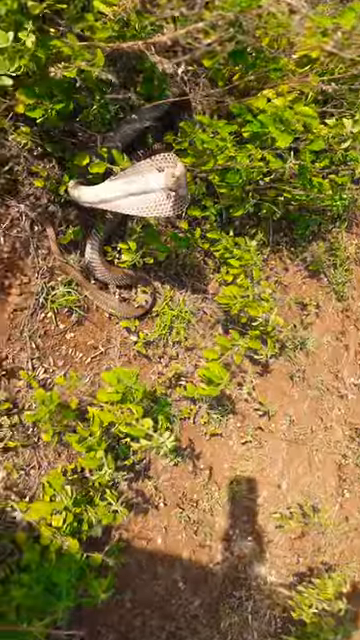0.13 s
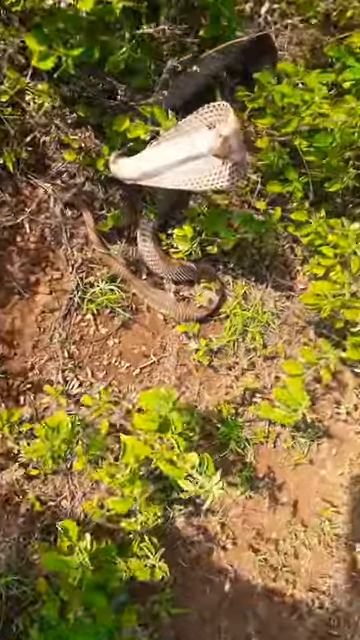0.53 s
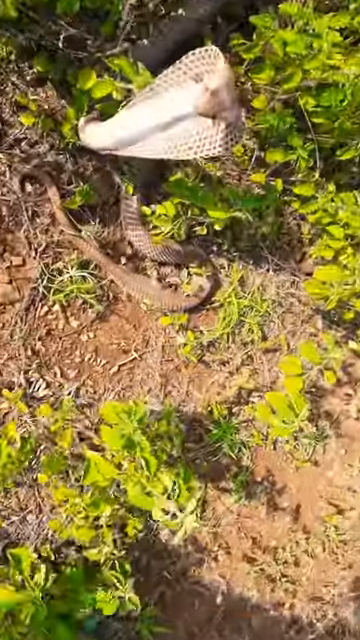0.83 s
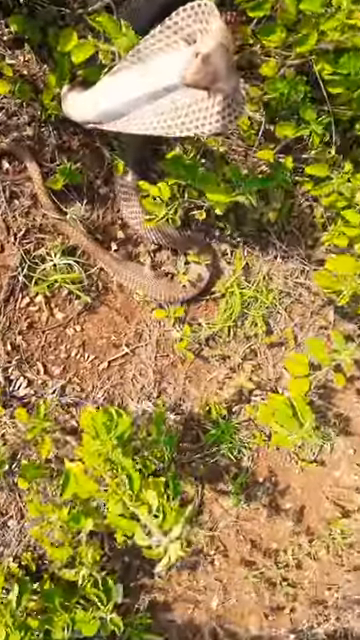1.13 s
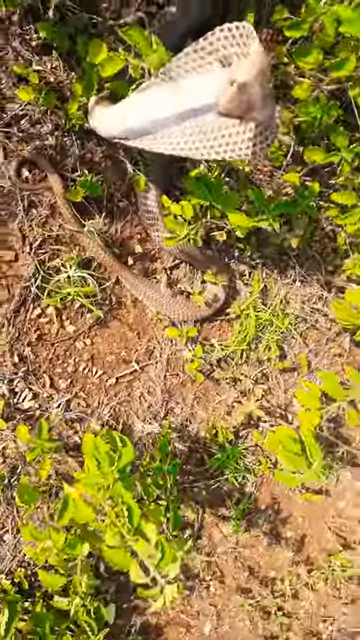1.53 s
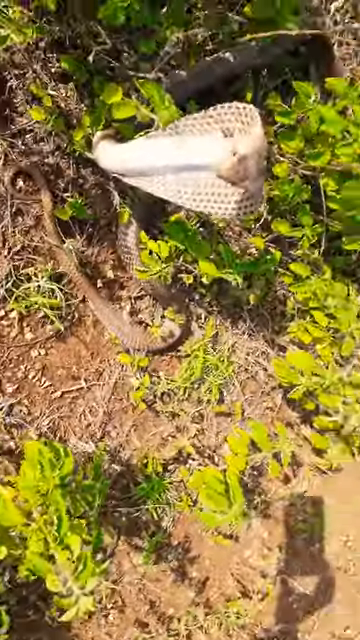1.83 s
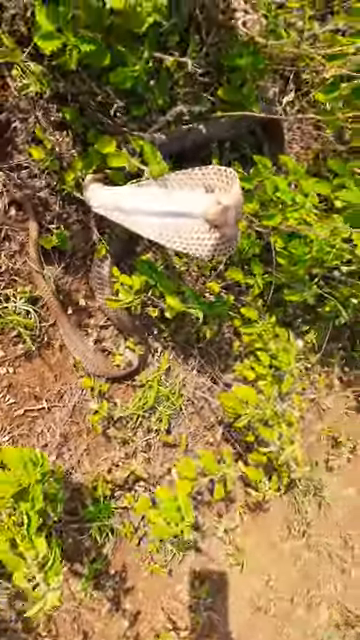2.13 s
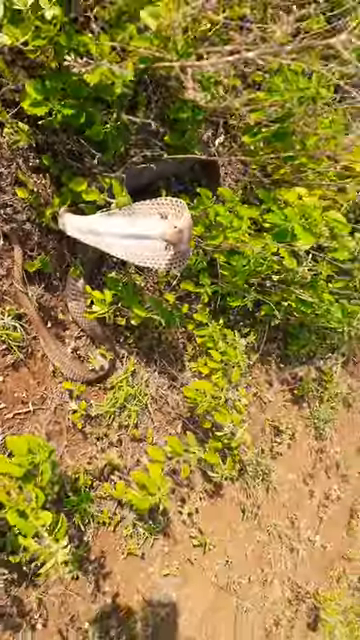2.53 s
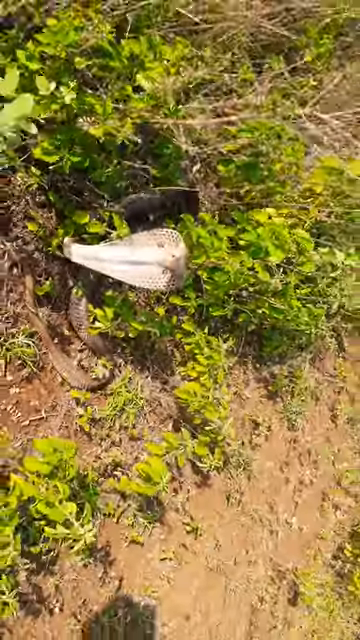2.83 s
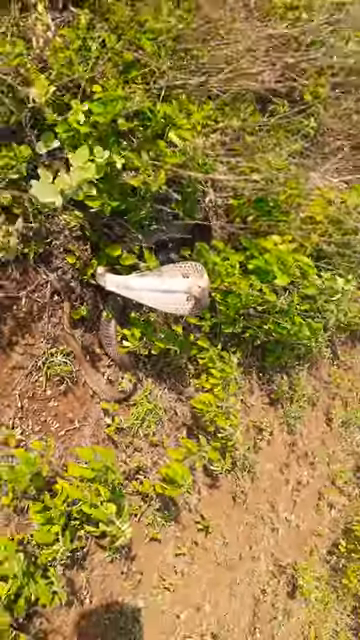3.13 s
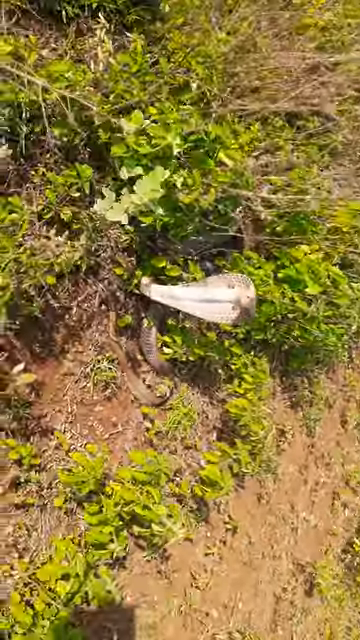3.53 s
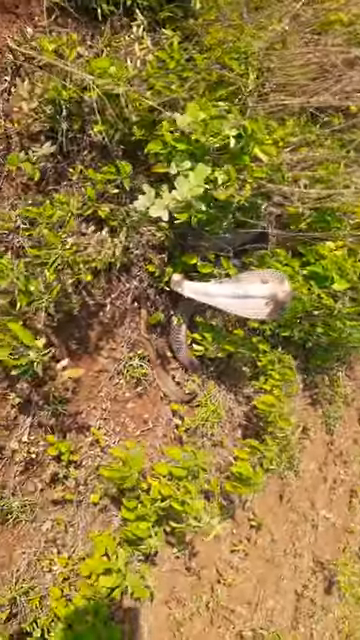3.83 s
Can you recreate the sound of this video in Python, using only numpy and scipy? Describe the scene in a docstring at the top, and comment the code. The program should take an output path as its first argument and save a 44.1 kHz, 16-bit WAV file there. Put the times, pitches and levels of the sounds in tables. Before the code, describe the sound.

A cobra blows a long, breathy hiss, pauses briefly, draws a softer, thinner hiss, then blows weakly. Uneven wind rumbles on a close stereo microphone in open dry scrub, with twig snaps and late handling thumps.

```python
"""Wind rumbles and thumps unevenly on two microphone ports while a cobra in dry scrub blows long and hard.
A softer indrawn hiss follows, then a weak blow; dry twigs and leaves tick, snap and scrape around it.
Near the end something covers and rubs the right port, and a foot scuffs the dry ground.
The hiss is noise shaped by drifting airway resonances; wind, friction and ticks are coloured noise,
thumps are short pressure swings, snaps are single pulses and the thin whistles are wavering sines."""
import sys
import numpy as np
from scipy import signal
from scipy.fft import rfft, irfft, next_fast_len
from scipy.io import wavfile
from scipy.ndimage import uniform_filter1d, map_coordinates

SR = 44100
rng = np.random.default_rng(int(sys.argv[2]) if len(sys.argv) > 2 else 0)


def wav_out(sig):
    """Save sig, one row per channel (or a flat mono array), as 16-bit PCM at SR to the path in sys.argv[1]."""
    wavfile.write(sys.argv[1], SR, np.round(np.clip(np.atleast_2d(sig).T, -1, 1) * 32767).astype(np.int16))


N = 176400

START_S, TOP_HZ = .036, 15780  # silence before this time; upper band limit

# Colour tables give relative level per Hz: the noise is scaled to rms 1 afterwards.
# distant outdoors: freq_hz, density_db
FLOOR_COLOUR = [(40, 7), (200, -10), (650, -16), (2000, -7), (3300, -21), (15000, -26)]
FLOOR_DB = -75.5

# faint rising whistles: start_s, level_db
WHISTLES = [(2.335, -67.5), (2.781, -75)]
WHISTLE_S, WHISTLE_HZ, WHISTLE_RISE_HZ_PER_S = 0.09, 4750, 8000
# the airway sings thinly: start_s, length_s, pitch_hz, level_db
AIRWAY_NOTES = [(3.484, 0.24, 2570, -75)]

# wind strength at each port: time_s, left_db, right_db
WIND_STRENGTH = [(.04, -39.5, -40), (.18, -37.5, -36), (.27, -41.5, -47), (.45, -46.5, -81),
                 (.53, -33.5, -34), (.61, -53.5, -42.5), (.68, -34.5, -32), (.83, -41, -36.5),
                 (1.03, -73, -49), (1.2, -37.5, -39.5), (1.44, -54, -40.5), (1.54, -48.5, -50),
                 (1.96, -59.5, -46), (2.2, -66.5, -56), (2.38, -53, -44), (2.6, -56.5, -77),
                 (2.71, -47.5, -46), (2.8, -53, -71), (3.02, -54, -86), (3.17, -50.5, -42),
                 (3.355, -81, -49), (3.385, -42, -35), (3.49, -49.5, -49.5), (3.65, -39, -36.5),
                 (3.72, -40, -36), (3.8, -96, -38), (4, -59, -47)]
# slow eddies: freq_hz, density_db
RUMBLE_COLOUR = [(20, -12), (35, -6.5), (60, 1.5), (110, 4), (200, -16.5), (400, -25.5), (1000, -87)]
# fast eddies: freq_hz, density_db
BUFFET_COLOUR = [(50, -17.5), (130, 1.5), (230, 0.5), (390, -4), (520, -13), (800, -27.5), (1600, -31.5),
                 (4000, -56.5)]
LUMP_DB, LUMPS_PER_S = 4, 36
# each level is relative to the reference gust; growth is dB gained per dB of wind
GUST_REF_DB = -38.5
RUMBLE_DB, RUMBLE_GROWTH = -1.5, 0.84
BUFFET_DB, BUFFET_GROWTH = -5.5, 1.52
# share of a slow eddy that pulls at the other port; left minus right
RUMBLE_OPPOSED, RUMBLE_SIDE_DB = 0.09, -1.5

# low thumps on the microphone: time_s, peak_db, pitch_hz, left_minus_right_db
THUMPS = [(0.09, -27, 189, -24), (0.159, -37.5, 103, 10), (0.494, -24, 151, 7), (0.754, -38, 283, -9),
          (0.954, -33, 148, -12), (1.194, -32, 154, 2), (1.977, -44, 204, 1), (2.147, -48, 400, 8),
          (2.303, -27, 236, 4), (2.349, -32.5, 100, -3), (2.70, -40.5, 125, -4), (3.083, -41.5, 147, 9),
          (3.419, -35.5, 150, -12), (3.673, -33.5, 533, -2), (3.684, -22, 266, -9),
          (3.7074, -16.5, 336, 0.5), (3.715, -27.5, 364, -8), (3.726, -20.5, 252, -4.5),
          (3.755, -23.5, 345, -2), (3.936, -23, 380, 4.5), (3.961, -25.5, 223, -4)]
THUMP_CYCLES, THUMP_SKEW = 0.37, 0.21  # length; spread of phase between ports (cycles)
SHUDDER_DB, SHUDDER_S = -11.5, 0.011  # relative level and decay

# dry leaves scraping: time_s, level_db, swell_and_fade_s, centre_hz, width_octaves
RUSTLES = [(.229, -54, .007, 3360, 2.4), (0.271, -44.5, 0.0092, 2220, 1.9),
           (.586, -50.5, .005, 13300, 0.23), (.69, -52.5, 0.0051, 1710, 1.4),
           (0.752, -51.5, 0.0093, 1590, 1.1)]

# dry ticks and crackles: start_s, level_db, decay_s, tilt_db_per_octave, left_minus_right_db
TICKS = [(.157, -50, 0.01, 5, 2), (2.647, -55.5, 0.0033, -1, 0), (3.078, -47, 0.0022, 5, -14),
         (3.129, -47, 0.0073, 7.5, 0), (3.478, -58, 0.0059, 2.5, -24), (3.705, -55.5, 0.0057, 2, -9),
         (3.845, -53, 0.0022, 2, 5)]
# tick colour before tilt: freq_hz, density_db
TICK_COLOUR = [(200, -14), (1300, -1), (2500, 1), (5000, -7), (7500, -4.5), (9500, -16.5), (13000, -6.5),
               (16000, -15.5)]
TICK_PIVOT_HZ, TICK_RISE = 3000, 0.55  # tilt pivot; rise time as a share of decay

# twigs snapping: start_s, peak_db, left_minus_right_db
SNAPS = [(.271, -31, 4), (.3185, -36, 4), (1.657, -22.5, 14)]
# snap spectrum: freq_hz, density_db
SNAP_COLOUR = [(300, -9), (1400, 5.5), (3000, -1), (6500, -4.5), (9500, -11), (13000, -14)]

# rubbing over the right port: time_s, level_db
RUB_LEVEL = [(3.07, -115), (3.16, -56), (3.27, -59), (3.33, -70), (3.42, -60), (3.52, -70), (3.68, -60),
             (3.76, -51.5), (3.83, -54.5), (3.9, -52), (4, -50)]
# rubbing friction: freq_hz, density_db
RUB_COLOUR = [(200, 10), (800, -4.5), (1400, -5.5), (2400, -6), (4500, -10.5), (6500, -24), (9500, -41),
              (13000, -27)]
RUB_LEFT_DB = -3  # left port relative to right

# foot on dry soil: freq_hz, density_db
SCUFF_COLOUR = [(300, 15), (1000, 3.5), (1700, -6), (2150, 3.5), (2800, -17), (4200, -6), (8000, -33),
                (12500, -12), (16000, -29)]
SCUFF_START_S, SCUFF_RELEASE_S, SCUFF_FALL_S, SCUFF_DB = 3.704, 3.782, 0.015, -46

# outward hiss by effort: time_s, level_db
BLOW_LEVEL = [(0, -57), (.25, -51), (.38, -53), (.78, -48.5), (1.3, -49), (1.5, -48.5), (1.75, -51),
              (1.93, -51.5), (2.03, -57.5), (2.12, -76.5), (2.22, -83), (3.25, -79), (3.4, -64),
              (3.6, -62.5), (3.8, -55.5), (4, -60)]
# inward hiss by effort: time_s, level_db
DRAW_LEVEL = [(2.13, -90), (2.24, -71.5), (2.36, -62.5), (2.45, -63.5), (3.12, -62), (3.36, -65.5),
              (3.45, -100)]
# outward turbulence in the airway: freq_hz, density_db
BLOW_AIR = [(100, -64), (250, -4.5), (400, -6), (550, -10.5), (1200, -16.5), (1750, -16), (2900, -20),
            (4400, -19), (6000, -16.5), (8200, -21), (9700, -23), (12000, -21), (15500, -19)]
# inward turbulence in the airway: freq_hz, density_db
DRAW_AIR = [(100, -13), (400, -13), (600, -12.5), (1250, -5.5), (1900, -11), (2500, -12.5), (4200, -6),
            (6500, -4.5), (9600, -15.5), (12500, -9), (15500, -15)]
# outward airway resonances: freq_hz, width_hz, lift_db
BLOW_PEAKS = [(368, 143, 5), (692, 110, 6.5), (862, 116, 10.5), (994, 80, 11.5), (1463, 234, 10.5),
              (1860, 210, 7.5), (2085, 235, 6.5), (2665, 150, 6), (3650, 110, 6), (4120, 470, 7),
              (4660, 210, 8.5), (5150, 420, 5.5), (7470, 1470, 4.5), (12440, 1950, 3.5)]
# inward airway resonances: freq_hz, width_hz, lift_db
DRAW_PEAKS = [(860, 72, 11), (987, 120, 14.5), (1467, 120, 9.8), (1660, 124, 11), (2130, 350, 10.6),
              (2950, 220, 4.2), (4590, 200, 7), (5170, 270, 3.5), (8200, 1000, 4.5)]
# drift of the resonances as the throat changes shape: time_s, shift_percent
THROAT_DRIFT = [(0, 4.5), (.9, 0), (1.6, 0), (2.4, -1), (3, 3)]
# outward hiss at the two ports: freq_hz, left_minus_right_db
BLOW_SIDE = [(250, -6), (450, 8.5), (850, -0.5), (2100, 3), (2600, -5.5), (4500, -1), (7500, 1),
             (9700, -11), (12900, -3), (15500, -9)]
# inward hiss at the two ports: freq_hz, left_minus_right_db
DRAW_SIDE = [(450, -9), (1000, 0.5), (2150, 8), (3400, -8.5), (4400, -4), (7500, 0), (10000, -11.5),
             (15500, -2)]
# hiss shared by the two ports: freq_hz, coherence (clipped to 0-1 in use)
PORT_COHERENCE = [(300, 0.67), (550, 0.74), (900, 1.07), (2000, 1), (2800, -0.1), (4400, 1), (7500, 0.52),
                  (9600, 0.2), (12500, 0.4)]
# delay of the left port behind the right: time_s, lag_ms
PORT_LAG = [(0, 0.18), (.3, 0.15), (1.25, 0.27), (2.3, 0.11), (3, 0.099)]
# sound bending round the microphone body: freq_hz, left_lead_radians
BODY_BEND = [(900, 0.14), (1500, 0.11), (2100, -0.72), (2900, -1.05), (3700, 0.18)]
# edge added to the hiss by a hard blow: freq_hz, gain_db at full effort
EDGE_GAIN = [(2500, -14.5), (4200, -20.5), (6200, -78), (7700, -9.5), (9800, -22), (12500, -15),
             (15000, -48)]
FULL_EFFORT_DB, EDGE_GROWTH = -49, 3.4  # growth: dB of edge per dB of effort
# covering of the right port: time_s, share (0-1)
COVER_SHARE = [(3.11, 0), (3.2, 0.9), (3.215, 1)]
# gain through the cover: freq_hz, gain_db
COVER_GAIN = [(300, -26), (1500, -35), (4000, -25), (8000, -52), (14000, -13)]


def amp(db):
    """Decibels to gain."""
    return 10 ** (np.asarray(db) / 20)


def unit(x):
    """Scale to rms 1."""
    return x / np.sqrt(np.mean(x ** 2) + 1e-20)


def along(points, hz):
    """Interpolate (frequency, value) points on a log frequency axis."""
    f, v = np.transpose(points)
    return np.interp(np.log(hz + 1), np.log(f + 1), v)


def curves(rows):
    """One value per sample for each column after the time."""
    s, *cols = np.transpose(rows)
    return np.array([np.interp(np.arange(N) / SR, s, c) for c in cols])


def wobble(rate):
    """A smooth random curve, rate knots a second."""
    knots = rng.standard_normal(N // 20)
    return map_coordinates(knots, [np.arange(N) * rate / SR], mode="mirror")


def panned(side_db):
    """Left and right gains of mean power 1."""
    g = amp(np.array([[.5], [-.5]]) * side_db)
    return g / np.sqrt(np.mean(g ** 2, axis=0))


def filtered(x, response):
    """Apply a complex response of frequency to x."""
    m = next_fast_len(x.shape[-1] + 8192)
    spectrum = rfft(x, m) * response(np.fft.rfftfreq(m, 1 / SR))
    return irfft(spectrum, m)[..., :x.shape[-1]]


def noise(colour):
    """Unrelated coloured noise at each port, rms 1."""
    return unit(filtered(rng.standard_normal((2, N)), lambda hz: amp(along(colour, hz))))


def tone(s, length, start_hz, rise, waver_hz):
    """A wavering sine that swells and fades."""
    t = np.clip(np.arange(N) / SR - s, 0, length)
    hz = start_hz + rise * t + waver_hz * wobble(370)
    return np.sin(np.pi * t / length) * np.sin(2 * np.pi * np.cumsum(hz) / SR)


def outdoors():
    """Steady, distant outdoor noise, unrelated at the two ports."""
    return amp(FLOOR_DB) * noise(FLOOR_COLOUR)


def whistles():
    """Thin upward slurs, perhaps a distant bird, and a breathy note within the hiss."""
    out = np.zeros(N)
    for s, db in WHISTLES:
        out += amp(db) * tone(s, WHISTLE_S, WHISTLE_HZ, WHISTLE_RISE_HZ_PER_S, waver_hz=110.6)
    for s, length, hz, db in AIRWAY_NOTES:
        out += amp(db) * tone(s, length, hz, 0, waver_hz=90)
    return out


def wind():
    """Eddies buffet the two ports unevenly; stronger gusts are brighter."""
    gust = curves(WIND_STRENGTH) - GUST_REF_DB
    lumps = amp(LUMP_DB * np.array([wobble(LUMPS_PER_S), wobble(LUMPS_PER_S)]))
    eddies = lumps * noise(RUMBLE_COLOUR)
    rumble = unit(eddies - RUMBLE_OPPOSED * eddies[::-1]) * panned(RUMBLE_SIDE_DB)
    rumble = rumble * amp(RUMBLE_DB + RUMBLE_GROWTH * gust)
    buffet = unit(lumps * noise(BUFFET_COLOUR)) * amp(BUFFET_DB + BUFFET_GROWTH * gust)
    return amp(GUST_REF_DB) * (rumble + buffet)


def thumps():
    """Short pressure swings, a little different at each port, each with a shudder near its own pitch."""
    out, t = np.zeros((2, N)), np.arange(N) / SR
    shudder = noise(BUFFET_COLOUR)
    for s, db, pitch_hz, side_db in THUMPS:
        turn, skew = rng.standard_normal(2)
        cycles = (t - s) * pitch_hz
        port_phase = THUMP_SKEW * skew * np.array([[.5], [-.5]])
        swing = np.cos(2 * np.pi * (cycles + turn + port_phase))
        swing = swing / np.cosh(np.clip(cycles / THUMP_CYCLES, -20, 20))
        # the shudder fades in over the cycle before the peak
        tail = amp(SHUDDER_DB) * np.clip(cycles + 1, 0, 1) * np.exp(-np.abs(t - s) / SHUDDER_S)
        rough = unit(filtered(shudder, lambda f: (f / pitch_hz) / (1 + (f / pitch_hz) ** 2) ** 2))
        out += amp(db) * panned(side_db) * (swing + tail * rough)
    return out


def rustles(grain_db=3.5, grain_rate=900):
    """Dry leaves scrape: ragged swells in one band each, partly shared by the ports."""
    out, t = np.zeros((2, N)), np.arange(N) / SR
    for s, db, fade, centre, octaves in RUSTLES:
        band = lambda hz: 1 / (1 + (2 * np.log2((hz + 20) / centre) / octaves) ** 2) ** 2
        scrape = filtered(rng.standard_normal(N) + .5 * rng.standard_normal((2, N)), band)
        ragged = unit(scrape * amp(grain_db * wobble(grain_rate)))
        out += amp(db) * ragged * np.exp(-np.abs(t - s) / fade)
    return out


def ticks():
    """Twigs and dry leaves crack: bursts that die within milliseconds."""
    out, t = np.zeros((2, N + SR)), np.arange(SR // 8) / SR
    for s, db, decay, tilt_db, side_db in TICKS:
        tilt = lambda hz: tilt_db * np.log2((hz + 20) / TICK_PIVOT_HZ)
        colour = lambda hz: amp(along(TICK_COLOUR, hz) + tilt(hz))
        # equal parts shared and unrelated at the ports
        grit = rng.standard_normal(len(t)) + rng.standard_normal((2, len(t)))
        burst = unit(filtered(grit, colour))
        envelope = 2 * (1 - np.exp(-t / (TICK_RISE * decay))) * np.exp(-t / decay)
        out[:, round(s * SR):][:, :len(t)] += amp(db) * panned(side_db) * burst * envelope
    return out[:, :N]


def snaps():
    """Twigs break: one sharp pulse each, with a very short ring."""
    out = np.zeros((2, N))
    hz = np.fft.rfftfreq(1024, 1 / SR)
    # folding the cepstrum puts the pulse's energy at its onset (minimum phase)
    cepstrum = irfft(np.log(amp(along(SNAP_COLOUR, hz))))
    pulse = irfft(np.exp(rfft(2 * cepstrum[:len(hz) - 1], len(cepstrum))))
    pulse = pulse / np.abs(pulse).max()
    for s, db, side_db in SNAPS:
        out[:, round(s * SR):][:, :len(pulse)] += amp(db) * panned(side_db) * pulse
    return out


def rub(grain_db=2.5, grain_rate=300):
    """Dull, grainy friction, stronger at the right port."""
    friction = unit(noise(RUB_COLOUR) * amp(grain_db * wobble(grain_rate)))
    return friction * amp(curves(RUB_LEVEL)) * np.array([[amp(RUB_LEFT_DB)], [1]])


def scuff(grain_db=4, grain_rate=300):
    """Grit crunches under a sole, then settles."""
    t = np.arange(N) / SR
    press = (t > SCUFF_START_S) * np.exp(-np.maximum(t - SCUFF_RELEASE_S, 0) / SCUFF_FALL_S)
    crunch = unit(noise(SCUFF_COLOUR) * amp(grain_db * wobble(grain_rate)))
    return amp(SCUFF_DB) * press * crunch


def air_at_ports():
    """Turbulence reaches the right port first, mixed with scattered sound unrelated at the ports."""
    share = lambda hz: np.clip(along(PORT_COHERENCE, hz), 0, 1)
    jet = filtered(rng.standard_normal(N), lambda hz: np.sqrt(share(hz)))
    lag = curves(PORT_LAG)[0] * SR / 1000  # ms to samples
    direct = np.array([map_coordinates(jet, [np.arange(N) + half * lag], order=5) for half in (-.5, .5)])
    direct = filtered(direct, lambda hz: np.exp(1j * np.array([[.5], [-.5]]) * along(BODY_BEND, hz)))
    scattered = filtered(rng.standard_normal((2, N)), lambda hz: np.sqrt(1 - share(hz)))
    return direct + scattered


def hiss(level, air, peaks, side, flutter_db, moving_below_hz, patchy_db):
    """Turbulent air rings the snake's airway, whose lower resonances drift and whose spectrum swells."""
    hz, t, z = signal.stft(air_at_ports(), SR, nperseg=2048)
    stretch = 1 + np.interp(t, *np.transpose(THROAT_DRIFT)) / 100
    lift = np.zeros((len(hz), len(t)))
    for f, width, db in peaks:
        centre = f * (stretch if f < moving_below_hz else np.ones_like(t))
        lift += db * 2 ** -(2 * (hz[:, None] - centre) / width) ** 2
    # random patches, smoothed over frequency and then time
    swells = uniform_filter1d(rng.standard_normal(lift.shape), size=14, axis=0)
    swells = unit(uniform_filter1d(swells, size=9, axis=1))
    airway = amp(along(air, hz)[:, None] + lift + patchy_db * swells)
    airway = airway * panned(along(side, hz))[..., None]
    voiced = unit(signal.istft(z * airway)[1][:, :N])
    return voiced * amp(curves(level) + flutter_db * wobble(22.46))


def snake():
    """Outward and inward hiss, sharper when blown hard, dulled on the right once that port is covered."""
    blow = hiss(BLOW_LEVEL, BLOW_AIR, BLOW_PEAKS, BLOW_SIDE,
                flutter_db=1.0, moving_below_hz=3900, patchy_db=1.75)
    effort = np.minimum(curves(BLOW_LEVEL) - FULL_EFFORT_DB, 1)  # dB, held at 1 above full
    edge = filtered(blow, lambda hz: amp(along(EDGE_GAIN, hz))) * amp(EDGE_GROWTH * effort)
    draw = hiss(DRAW_LEVEL, DRAW_AIR, DRAW_PEAKS, DRAW_SIDE,
                flutter_db=0.84, moving_below_hz=7000, patchy_db=2.26)
    left, right = blow + edge + draw
    cover = np.clip(curves(COVER_SHARE)[0], 0, 1)
    muffled = filtered(right, lambda hz: amp(along(COVER_GAIN, hz)))
    return np.array([left, (1 - cover) * right + cover * muffled])


def scene():
    """Everything in open air, with no echo."""
    background = outdoors() + whistles() + wind() + thumps()
    scrub = rustles() + ticks() + snaps()
    handling = rub() + scuff()
    return background + scrub + handling + snake()


def record(dry):
    """The microphone opens after a brief silence and keeps nothing above its band limit."""
    opened = dry * (np.arange(N) / SR > START_S)
    return filtered(opened, lambda hz: hz < TOP_HZ)


dry = scene()
out = record(dry)
wav_out(out)
```